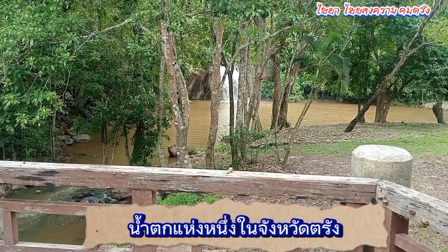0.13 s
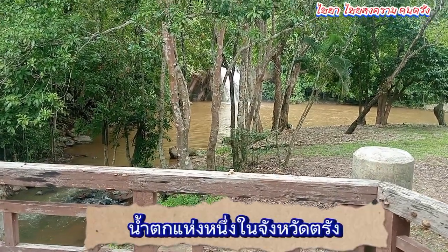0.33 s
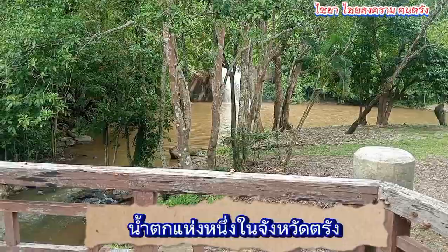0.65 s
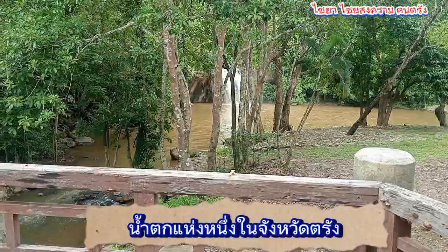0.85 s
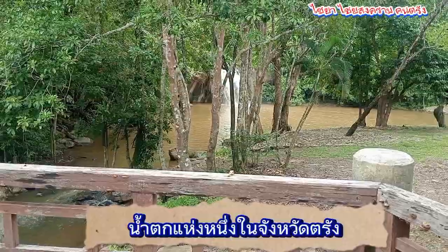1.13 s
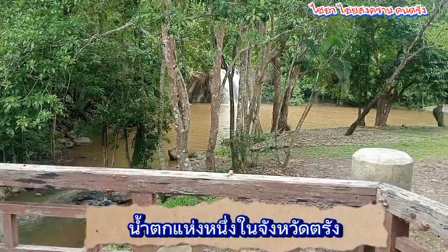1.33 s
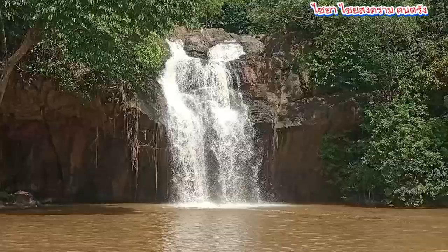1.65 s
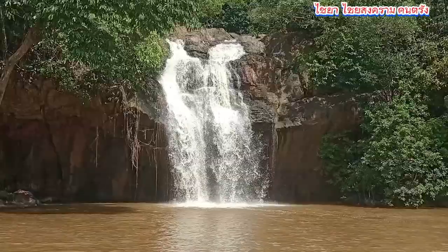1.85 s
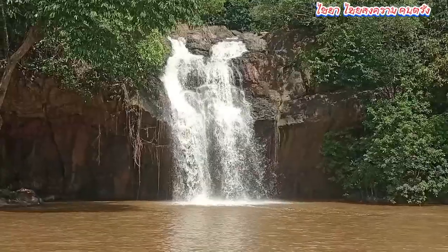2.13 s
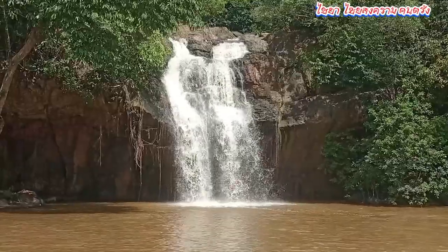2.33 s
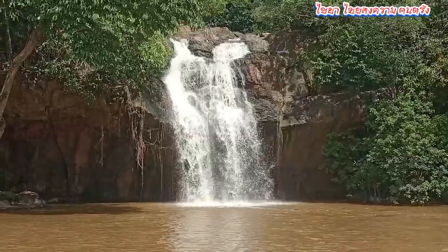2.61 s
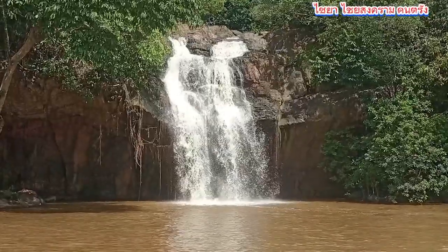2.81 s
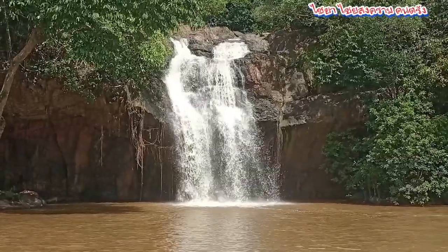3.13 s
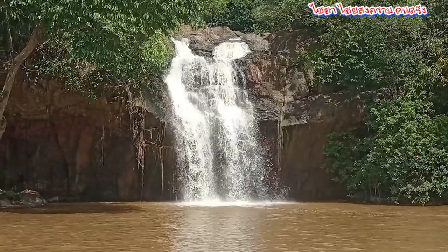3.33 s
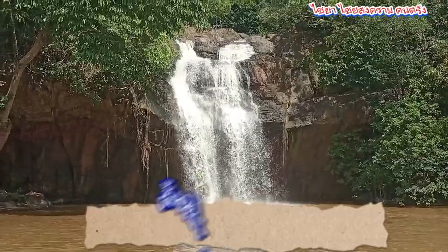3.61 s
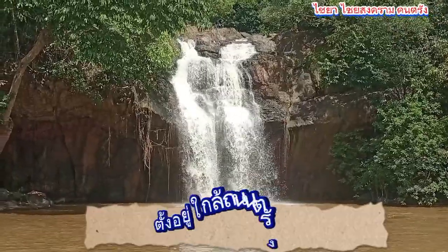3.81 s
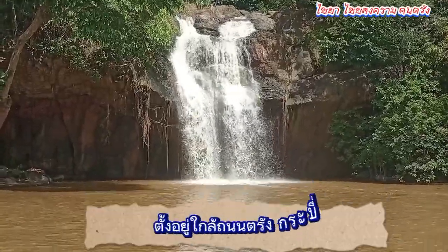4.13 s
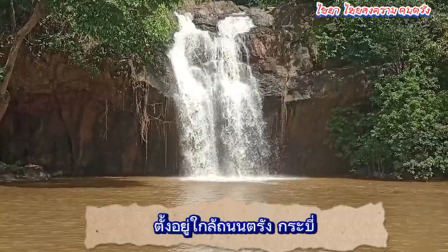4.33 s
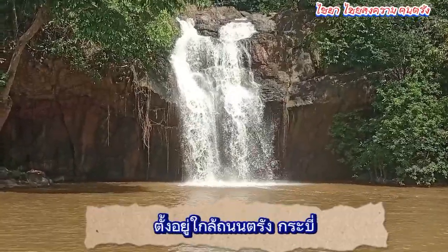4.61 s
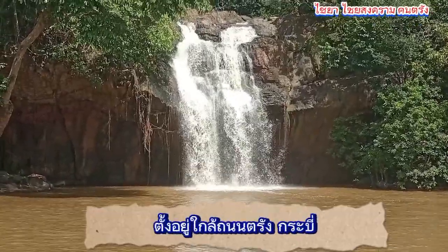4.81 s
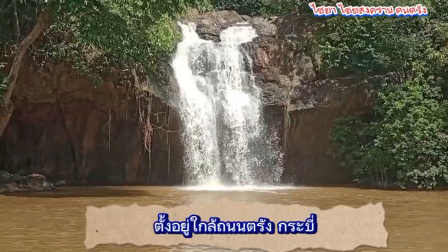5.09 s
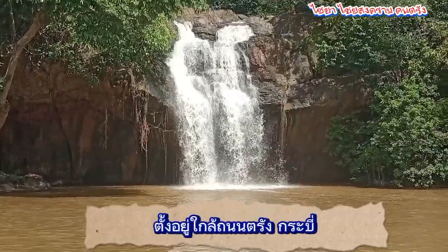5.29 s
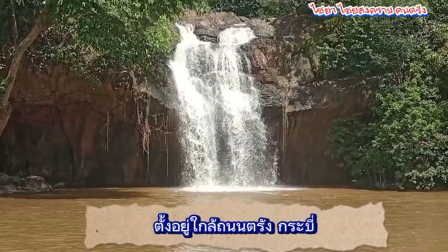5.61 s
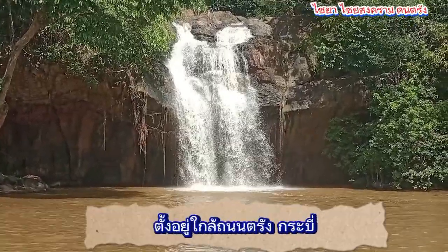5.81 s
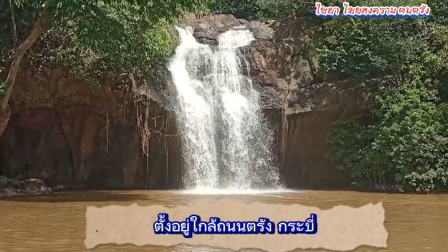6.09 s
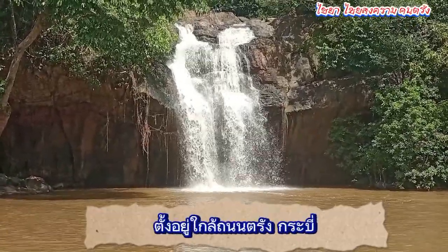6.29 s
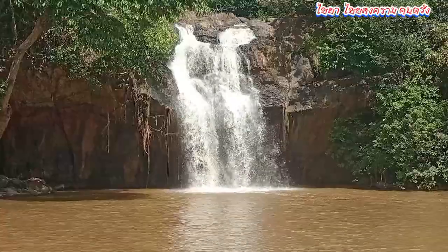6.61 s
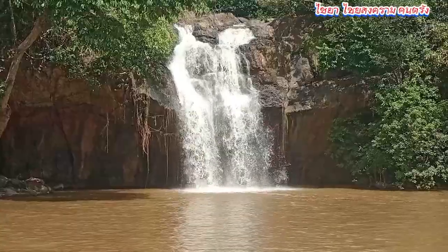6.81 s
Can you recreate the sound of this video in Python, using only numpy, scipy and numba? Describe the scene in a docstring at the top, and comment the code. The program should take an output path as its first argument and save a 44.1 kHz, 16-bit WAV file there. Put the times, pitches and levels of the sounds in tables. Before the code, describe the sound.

Two continuous water sounds follow each other: first a moderately quiet, smooth river rush from some distance, then, after a split-second silence, a nearer waterfall about ten decibels louder, hissing and splashing into a pool. Cicadas buzz faintly in both parts. A remote engine hums softly under the river; another thuds low under the fall, swelling midway and losing speed. Open forest, centred mono microphone.

```python
"""First a swollen forest river rushes past a footbridge; after a short silence a closer, louder waterfall
pours into its pool. Both waters are shaped noise mixed with thousands of tiny ringing bubbles.
Cicadas, made of noise squeezed into narrow bands, buzz faintly in the trees.
By the river a small engine hums far off, made of two wavering tones. Under the roar of the fall another
one putters, made of uneven thumps, rough puffs and a drone, and slowly loses speed."""
import sys
import numpy as np
from scipy import signal
from scipy.fft import rfft, irfft, next_fast_len
from scipy.io import wavfile
from scipy.ndimage import uniform_filter1d
from numba import njit

SR = 44100
rng = np.random.default_rng(int(sys.argv[2]) if len(sys.argv) > 2 else 0)


def generate_wav(signal):
    """Clip the signal to [-1, 1] and save it as 16-bit WAV at the path in sys.argv[1]."""
    frames = np.transpose(np.atleast_2d(signal))
    scaled = np.clip(frames, -1, 1) * 32767
    pcm = np.round(scaled).astype(np.int16)
    wavfile.write(sys.argv[1], SR, pcm)


N = 306495

# tone colour of the river, as a curve: pitch_hz, relative level_db
RIVER_COLOUR = [(40, -13), (130, 2), (310, 1), (420, -8), (720, 0.1), (1020, -9.5), (1400, -4),
                (1550, -8.6), (2450, -4.5), (3620, -9.5), (5140, -21.5), (7570, -23), (9030, -14.5),
                (15300, -32)]
# tone colour of the waterfall, as a curve: pitch_hz, relative level_db
FALLS_COLOUR = [(45, -20), (72, -8.5), (150, 1), (270, -1.5), (430, -9), (540, -7), (820, -6.5),
                (1080, -10.5), (1300, -8.5), (1500, -11), (1720, -4.5), (2200, -7.5), (2900, -7.5),
                (3650, -1.58), (4960, -16.5), (7840, -20.5), (9750, -12.5), (13290, -29), (15300, -28.5)]
# tone colour of the engine's exhaust heard from afar, as a curve: pitch_hz, relative level_db
EXHAUST_COLOUR = [(40, -31), (60, -22), (80, -7), (118, -3), (160, 0), (190, -1), (250, -0.5), (340, -8.5),
                  (420, -23), (900, -42.5)]
# tones of the far engine by the river: pitch_hz, level_db (rms)
HUM_TONES = [(66, -55), (132, -57.5)]
# thin lines of the cicadas by the river: pitch_hz, level_db (rms)
RIVER_CICADA_LINES = [(6293, -68), (6449, -70), (6605, -67.5), (6772, -72), (6918, -69), (7117, -68),
                      (8958, -70), (10928, -67), (11666, -68)]
# bands of the cicada chorus at the pool: pitch_hz, width_hz (before widening), level_db (rms)
POOL_CICADA_BANDS = [(6030, 60, -55), (6445, 70, -51), (6554, 100, -47), (6740, 74, -49),
                     (7120, 200, -53.5)]

RIVER_END_S, FALLS_START_S = 1.671, 1.729
# level of the water above 1 kHz, before its slaps and the pool's fade
RIVER_DB, FALLS_DB = -41, -31
# the pool fades in from a low level, overshoots and settles
FADE_FROM_DB, FADE_S, OVERSHOOT_DB, SETTLE_S = -13, 0.26, 3.5, 0.16
# the engine's firing rate sags steadily, and sheds a little extra speed at first
FIRING_HZ, SAG_HZ_PER_S, EXTRA_HZ, SHED_S = 40.59, 0.73, 2.1, 0.8
# putter at FIRING_HZ: level, upper part against bass, and level change per hertz of speed
PUTTER_DB, PUTTER_BRIGHT_DB, PUTTER_DB_PER_HZ = -37, -2, 0.57
# the putter swells once: middle, time to fall to 37 % on either side, added level and brightness
SWELL_AT_S, SWELL_S, SWELL_DB, SWELL_BRIGHT_DB = 4.2, 0.95, 2.5, 4.5
# the crank's clean drone at FIRING_HZ: level, and level change per hertz of speed
DRONE_DB, DRONE_DB_PER_HZ = -45, 1.0
TOP_HZ = 15450  # upper limit of the microphone

TIME = np.arange(N) / SR  # seconds
POOL_AGE = np.maximum(TIME - FALLS_START_S, 0)  # seconds since the waterfall came in


def undb(db):
    """Turn decibels into a gain."""
    return 10 ** (np.asarray(db) / 20)


def unit(x):
    """Scale a sound to an rms level of 1."""
    return x / np.sqrt(np.mean(x ** 2))


def walk(rate):
    """A smooth random wander: levels held for 1 / rate seconds, averaged twice, scaled to rms 1."""
    hold = max(int(SR / rate), 2)
    # tanh rounds off the extremes
    steps = np.tanh(rng.standard_normal(N))[np.arange(N) // hold]
    smoothed = uniform_filter1d(steps, hold, mode="wrap")
    return unit(uniform_filter1d(smoothed, hold, mode="wrap"))


def colour(x, points):
    """Filter a sound along a curve of (Hz, dB) points, never reacting ahead of time."""
    size = 8192
    hz, db = np.transpose(points)
    freqs = np.maximum(np.fft.rfftfreq(size, 1 / SR), 1)
    gain_db = np.interp(np.log(freqs), np.log(hz), db)
    # folding the cepstrum (transform of the log gain) puts the filter's response after time zero
    cepstrum = irfft(np.log(undb(gain_db)))
    cepstrum[1:size // 2] *= 2
    cepstrum[size // 2 + 1:] = 0
    response = irfft(np.exp(rfft(cepstrum)))
    return signal.fftconvolve(x, response)[:N]


def resonate(x, hz, width_hz):
    """Ring at one pitch; the resonance is applied twice so that its sides are steep."""
    b, a = signal.iirpeak(hz, hz / width_hz, fs=SR)
    return signal.lfilter(b, a, signal.lfilter(b, a, x))


def forest(x, t60_s, wet_db):
    """Trunks and the rock face scatter a sound into a short diffuse tail, here fading noise."""
    age = TIME[:SR]
    echoes = rng.standard_normal(SR) * np.exp(-np.log(1000) * age / t60_s)
    tail = signal.fftconvolve(x, echoes / np.linalg.norm(echoes))[:N]
    return x + undb(wet_db) * tail


def reflections(x, db, count):
    """Nearby stones and trunks return faint early copies that ripple the spectrum."""
    lags = (SR * (0.003 + 0.02 * rng.random(count))).astype(int)
    # every other copy is flipped in sign
    copies = sum((-1) ** k * np.roll(x, lag) for k, lag in enumerate(lags))
    return x + undb(db) * copies / np.sqrt(count)


def far_hum(waver=0.017, swell_db=3):
    """The two lowest tones of a distant engine, wavering together in pitch and apart in strength."""
    seconds = np.cumsum(1 + waver * walk(12)) / SR
    hum = 0
    for hz, db in HUM_TONES:
        tone = np.sin(2 * np.pi * hz * seconds)
        hum = hum + undb(db) * unit(tone * undb(swell_db * walk(9.7)))
    return hum


def river_cicadas(width_hz=50, swell_db=4.5, drift=0.004):
    """Thin lines of a far buzz, each drifting in pitch, swelling and fading on its own."""
    buzz = 0
    for hz, db in RIVER_CICADA_LINES:
        line = resonate(rng.standard_normal(N), hz, width_hz)
        # turning the complex signal slides the pitch up and down
        bend = np.exp(2j * np.pi * hz * np.cumsum(drift * walk(4)) / SR)
        line = (signal.hilbert(line, next_fast_len(N))[:N] * bend).real
        buzz = buzz + undb(db) * unit(line * undb(swell_db * walk(6.5)))
    return buzz


def pool_cicadas(swell_db=1.6):
    """So many insects click at once that they merge into noise, which rings at the pitches of their bodies."""
    chorus = 0
    for hz, width, db in POOL_CICADA_BANDS:
        band = resonate(rng.standard_normal(N), hz, 1.4 * width)
        chorus = chorus + undb(db) * unit(band * undb(swell_db * walk(11)))
    return chorus


def engine(jitter=0.006, scatter_db=2.4, wobble_db=3):
    """One cylinder: an uneven thump at every firing, mostly its bass carrying, over a drone from the crank."""
    hz = FIRING_HZ - SAG_HZ_PER_S * POOL_AGE + EXTRA_HZ * np.exp(-POOL_AGE / SHED_S)
    swell = np.exp(-((TIME - SWELL_AT_S) / SWELL_S) ** 2)
    putter_db = PUTTER_DB + PUTTER_DB_PER_HZ * (hz - FIRING_HZ) + SWELL_DB * swell
    bright_db = PUTTER_BRIGHT_DB + SWELL_BRIGHT_DB * swell
    drone_db = DRONE_DB + DRONE_DB_PER_HZ * (hz - FIRING_HZ)

    # count the firings; each one gets its own strength
    turns = np.cumsum(hz * (1 + jitter * walk(20))) / SR
    scatter = np.clip(rng.standard_normal(N), -2, 2)
    strength = undb(scatter_db * scatter)[turns.astype(int)]
    firings = np.diff(np.floor(turns), prepend=0) * strength
    # each thump drags a short rough puff of gas
    puffs = np.exp(-(turns % 1) / 0.44) * strength * rng.standard_normal(N)
    blasts = unit(firings) + undb(-1.5) * unit(puffs)
    thumps = colour(forest(blasts, t60_s=0.24, wet_db=-4.5), EXHAUST_COLOUR)

    # the weight shifts from the bass to the upper part as it swells
    deep = signal.sosfiltfilt(signal.butter(2, 170, fs=SR, output="sos"), thumps)
    putter = unit(deep * undb(-bright_db / 2) + (thumps - deep) * undb(bright_db / 2))
    # the crank turns twice per firing
    drone = unit(np.sin(2 * np.pi * 2 * turns) * undb(wobble_db * walk(9)))
    return putter * undb(putter_db) + drone * undb(drone_db)


@njit
def ring(starts, hz, cycles, sizes, glide):
    """Each bubble is a dying sine whose pitch rises as it nears the surface."""
    out = np.zeros(N)
    for k in range(len(starts)):
        length, phase = int(cycles[k] * SR / hz[k]), 0.
        for i in range(min(length, N - starts[k])):
            age = i / length
            phase += 2 * np.pi * hz[k] * (1 + glide * age) / SR
            out[starts[k] + i] += sizes[k] * np.exp(-5 * age) * np.sin(phase)
    return out


def bubbles(low_hz, high_hz, cycles, spread_db, glide, count):
    """A swarm of bubbles at random times, mostly faint; a boost for high ones evens out the spectrum."""
    when, pitch, life, size = rng.random((count, 4)).T
    hz = low_hz + (high_hz - low_hz) * pitch ** 2  # low pitches are the most common
    sizes = undb(-spread_db * np.log(0.01 + size)) * hz ** 0.75
    starts = (when * N).astype(np.int64)
    return unit(ring(starts, hz, cycles * (0.5 + life), sizes, float(glide)))


def flicker(x, depth_db, hold_s, width_hz):
    """Patches of the spectrum, a splash long and a splash wide, swell and fade each on their own."""
    size = 256
    _, _, bins = signal.stft(x, nperseg=size)
    patches = rng.standard_normal(bins.shape)
    patches = uniform_filter1d(patches, max(round(hold_s * 2 * SR / size), 1), axis=1)
    patches = uniform_filter1d(patches, max(round(width_hz * size / SR), 1), axis=0)
    return signal.istft(bins * undb(depth_db * unit(patches)), nperseg=size)[1][:N]


def water(spectrum, fizz_db, gurgle_db, patchy_db, splash_db, patter_db, churn_db, echo_db):
    """Spray, fizz and longer-ringing bubbles; the upper part pulses like slaps, the lower part churns."""
    fizz = bubbles(863, 14300, cycles=4.6, spread_db=1, glide=0.18, count=36000)
    gurgle = bubbles(446.8, 4200, cycles=37.0, spread_db=2, glide=0.078, count=3000)
    spray = unit(rng.standard_normal(N))
    wash = spray + undb(fizz_db) * fizz + undb(gurgle_db) * gurgle
    wash = colour(flicker(wash, patchy_db, hold_s=0.042, width_hz=700), spectrum)
    # split at 1 kHz
    low = signal.sosfiltfilt(signal.butter(3, 1000, fs=SR, output="sos"), wash)
    high = reflections(wash - low, echo_db, count=6)
    slaps = undb(splash_db * walk(24) + patter_db * walk(220))
    churn = undb(churn_db * walk(16))
    return (high * slaps + low * churn) / np.std(high)


def river():
    """The swollen river heard from the bridge: rushing water with its own tone colour."""
    return undb(RIVER_DB) * water(RIVER_COLOUR, fizz_db=-5, gurgle_db=-12, patchy_db=1.0,
                                  splash_db=-0.04, patter_db=-0.3, churn_db=0.3, echo_db=-16)


def falls():
    """Sheets of water break on the rock and plunge into the pool."""
    return undb(FALLS_DB) * water(FALLS_COLOUR, fizz_db=-6.5, gurgle_db=-13.0, patchy_db=1.07,
                                  splash_db=0.15, patter_db=-0.29, churn_db=1.03, echo_db=-18.0)


def pool_fade():
    """Gain of the pool: a straight rise to a brief overshoot, which dies away."""
    rise = np.interp(POOL_AGE, [0, FADE_S], [undb(FADE_FROM_DB - OVERSHOOT_DB), 1])
    settling = np.exp(-np.maximum(POOL_AGE - FADE_S, 0) / SETTLE_S)
    return rise * undb(OVERSHOOT_DB * settling)


def scene():
    """First the bridge, then the pool; the sound is the same in both ears."""
    edge_s = 0.008  # length of the soft edges around the silence
    at_bridge = np.clip((RIVER_END_S - TIME) / edge_s + 0.5, 0, 1)
    at_pool = np.clip((TIME - FALLS_START_S) / edge_s + 0.5, 0, 1)
    bridge = river() + far_hum() + river_cicadas()
    pool = pool_fade() * (falls() + engine() + pool_cicadas())
    mono = at_bridge * bridge + at_pool * pool
    return np.array([mono, mono])


def record(dry, low_cut_hz=48):
    """The microphone drops the deepest bass, and the top is cut steeply."""
    low_cut = signal.butter(3, low_cut_hz, "high", fs=SR, output="sos")
    top_cut = signal.ellip(10, 0.1, 70, TOP_HZ, fs=SR, output="sos")
    return signal.sosfilt(top_cut, signal.sosfilt(low_cut, dry))


dry = scene()
out = record(dry)
generate_wav(out)
```